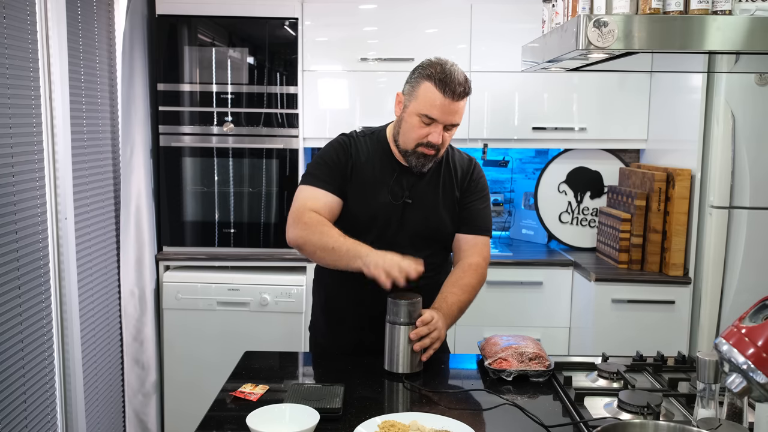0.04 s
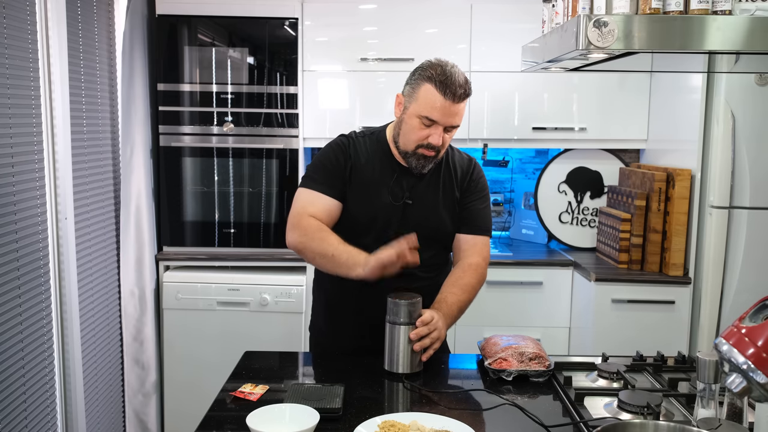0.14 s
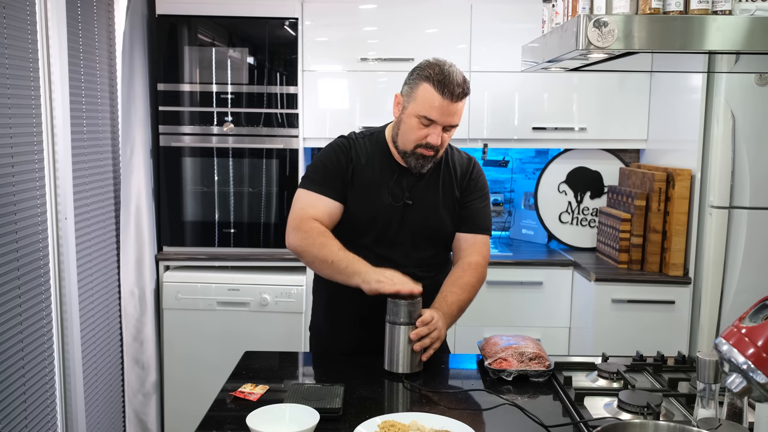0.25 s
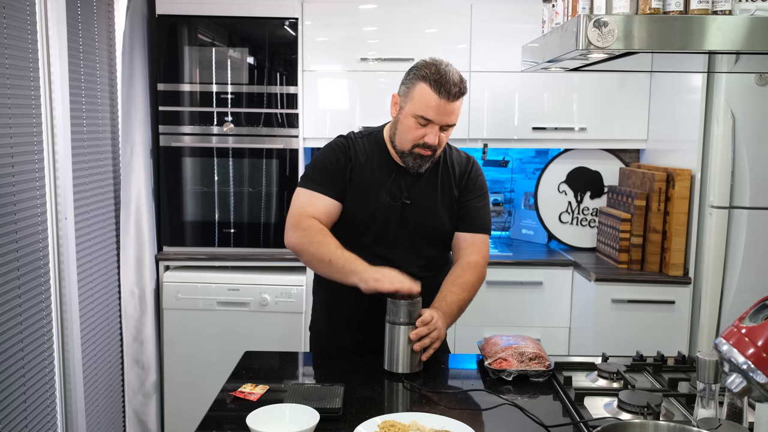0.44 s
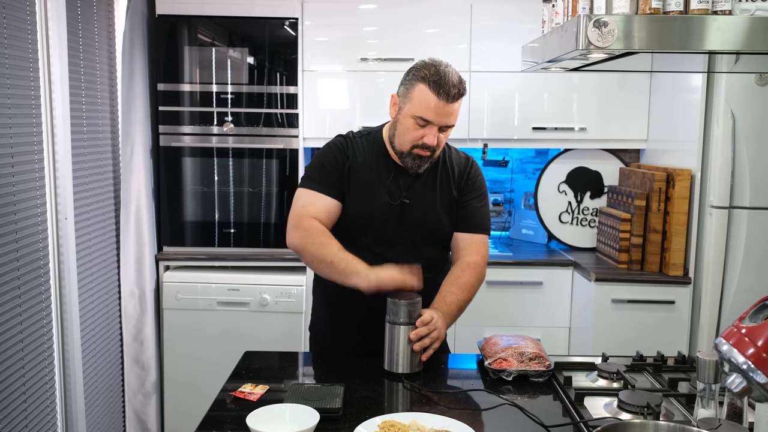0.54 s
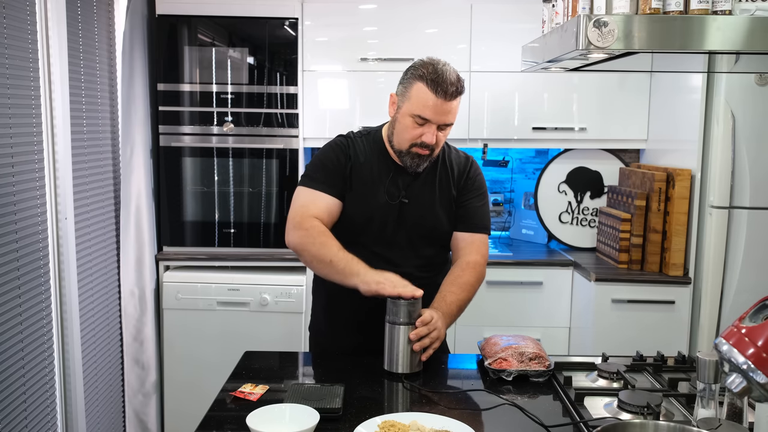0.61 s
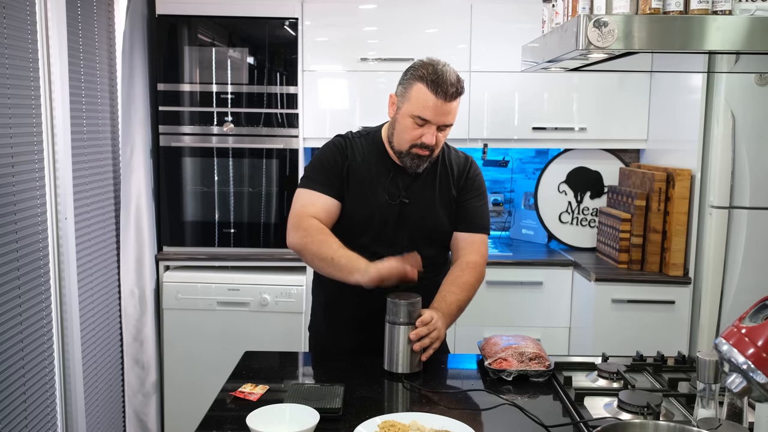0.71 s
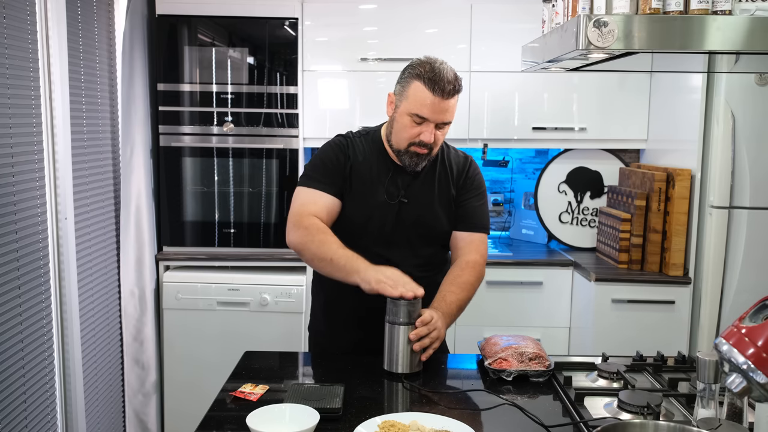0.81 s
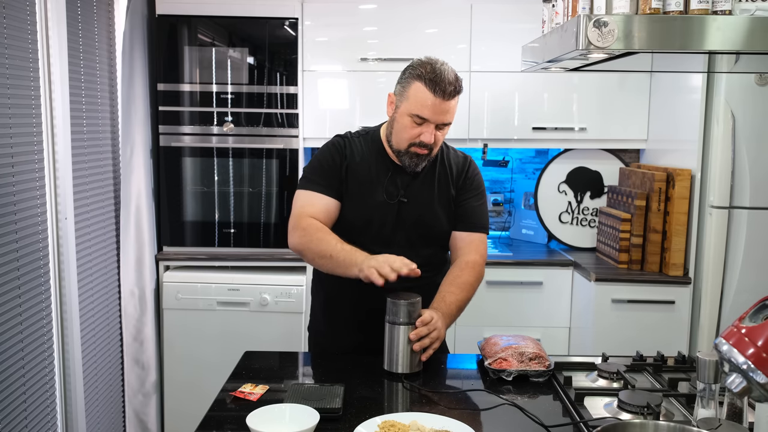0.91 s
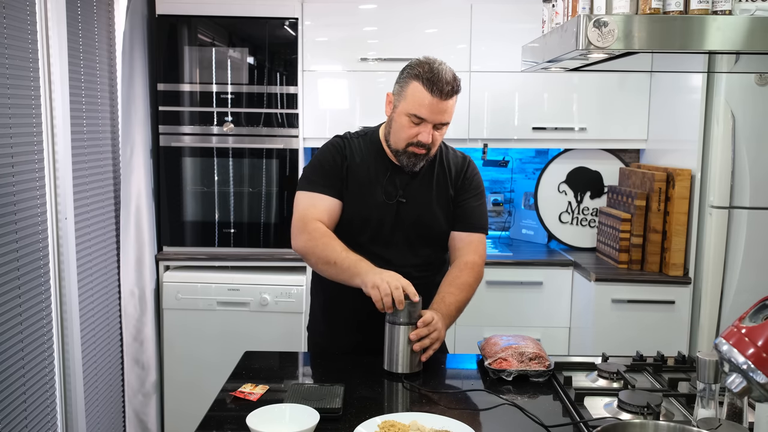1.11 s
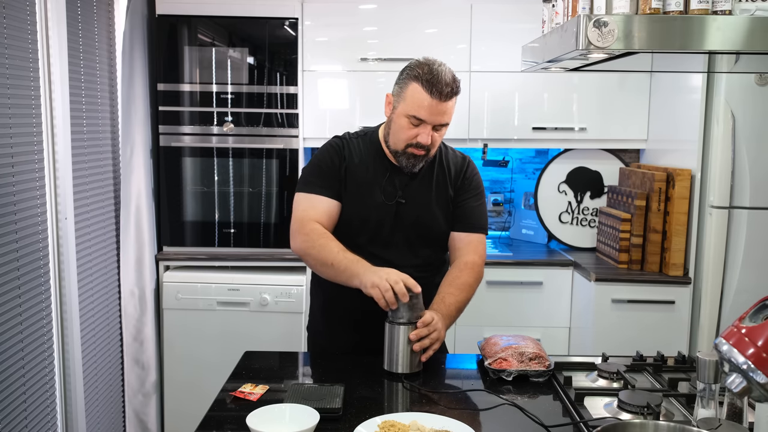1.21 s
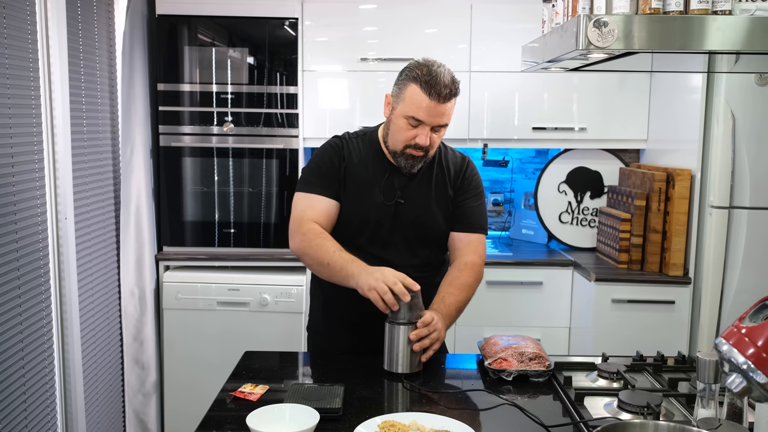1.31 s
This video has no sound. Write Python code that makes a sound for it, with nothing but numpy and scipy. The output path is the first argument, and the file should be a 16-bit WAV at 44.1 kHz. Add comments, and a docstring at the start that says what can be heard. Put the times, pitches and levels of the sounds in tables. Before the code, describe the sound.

Four loud, fleshy, hollow smacks on a metal grinder's lid ring briefly around a hard kitchen, followed by a much softer gritty turn of the lid with small bumps and clicks, over a faint low room hum.

```python
"""In a hard kitchen, a palm slaps the lid of a small steel spice grinder four times on a stone counter.
Each slap is skin crackle, an air-pocket pop and a snap; echoes, a diffuse tail, modes of room and counter
and two short knocks of the lid's body follow. Then the hand twists the lid: noise and grit rub, scrape
and ring the cup, with decaying bumps and clicks. A faint click of the lid opens the scene.
Filtered noise hums quietly throughout, and a faint wavering sine lies under the start."""
import sys
import numpy as np
from scipy import signal
from scipy.fft import rfft, irfft
from scipy.io import wavfile
from scipy.ndimage import uniform_filter1d

SR = 44100
rng = np.random.default_rng(int(sys.argv[2]) if len(sys.argv) > 2 else 0)


def transcribe(signal):
    """Save signal, clipped to [-1, 1], as a 16-bit WAV file at the path in sys.argv[1]."""
    frames = np.atleast_2d(signal).T
    limited = np.clip(frames, -1, 1)
    pcm = np.round(limited * 32767).astype(np.int16)
    wavfile.write(sys.argv[1], SR, pcm)


def ratio(d):
    """dB to gain"""
    e = np.asarray(d, float) / 20
    return 10 ** e


N = 59535  # length [samples]
CONTACT_S = .0028  # time over which the palm's contact grows [s]


def colour(x, table):
    """Minimum-phase filtering: the folded cepstrum of a (Hz, dB) shape gives a causal response."""
    hz, db = np.array(table).T
    f = np.linspace(1, SR / 2, 1025)
    log_gain = np.interp(np.log(f), np.log(hz), db) * np.log(10) / 20
    cepstrum = irfft(log_gain)
    cepstrum[1:1024] *= 2
    cepstrum[1025:] = 0
    response = irfft(np.exp(rfft(cepstrum)))
    return signal.fftconvolve(x, response)[:len(x)]


def level(x, db):
    """Root-mean-square scaling: sets the mean power of a signal."""
    return x * ratio(db) / np.sqrt(np.mean(x ** 2))


def ring(modes, length):
    """Modal superposition: a struck body sounds as a sum of exponentially decaying sines."""
    t = np.arange(length) / SR
    hz, db, t60 = np.array(modes).T[:, :, None]
    decay = 1000. ** (-t / t60)
    return (ratio(db) * np.sin(2 * np.pi * hz * t) * decay).sum(axis=0)


def push(duration):
    """Elastic contact: the force is a half sine, here of unit area."""
    phase = np.clip((np.arange(256) + .5) / (duration * SR), 0, 1)
    force = np.sin(np.pi * phase)
    return force / force.sum()


def add(out, s, x):
    """Linear superposition: sounds starting at different times sum."""
    i = int(s * SR)
    out[i:i + len(x)] += x[:len(out) - i]


# spectral shape of the room noise: (frequency [Hz], relative level [dB])
HUM_SHAPE = [(15, -49), (25, -22.5), (49, 11), (70, 6.5), (86, -17), (183, -5.5), (208, -8), (569, -14),
             (861, -12), (1060, -20.5), (12000, -40.5), (15600, -94), (22000, -120)]


def room_hum():
    """Stationary noise: white noise filtered to the spectrum of a quiet room."""
    return level(colour(rng.standard_normal(N), HUM_SHAPE), -62)


# modes of lid and cup: (frequency [Hz], relative level [dB], T60 [s])
CUP_MODES = [(350, -8, .1), (780, -10, .03), (1320, -12, .05), (1800, -10, .018), (2180, 0, .016),
             (2331, -10, .14), (3550, -18, .05), (4250, -13, .04), (5800, -16, .008), (6700, -8, .008),
             (8000, -12, .006), (9100, -14, .005), (11000, -11, .004)]


def cup_ring(length, above_hz=0):
    """Modal response: the impulse response of lid and cup is the sum of their modes."""
    return ring([mode for mode in CUP_MODES if mode[0] > above_hz], length)


# metal clicks of the lid: (time [s], peak level [dB], contact [s])
LID_CLICKS = [(.008, -62, .0002), (1.066, -66, .0001), (1.097, -60, .0002), (1.193, -45, .0004),
              (1.2685, -39, .00022), (1.338, -43, .0002)]


def lid_clicks():
    """Impact excitation: the derivative of a brief contact force drives the cup modes."""
    out, cup = np.zeros(N), cup_ring(8192)
    for s, db, contact in LID_CLICKS:
        click = np.convolve(np.diff(push(contact)), cup)
        add(out, s, ratio(db) * click / click.max())
    return out


# track of the faint tone: (time [s], frequency [Hz], level before flicker [dB])
TONE_TRACK = [(0.085, 852, -74), (0.097, 818, -79.5), (0.151, 879, -62), (0.177, 872, -77),
              (0.22, 870, -72)]


def faint_tone():
    """Frequency and amplitude modulation: a sine glides in pitch while smoothed noise wavers its level."""
    flicker_db, smoothing_s = 2.5, .02  # rms flicker [dB], averaging time [s]
    t = np.arange(N) / SR
    s, hz, db = np.array(TONE_TRACK).T
    phase = 2 * np.pi * np.cumsum(np.interp(t, s, hz)) / SR
    tone = np.sin(phase) * ratio(np.interp(t, s, db, left=-120, right=-120))
    flicker = level(uniform_filter1d(rng.standard_normal(N), int(smoothing_s * SR)), 0)
    return tone * ratio(flicker_db * flicker)


# spectral shape of the skin crackle: (frequency [Hz], relative level [dB])
SKIN_SHAPE = [(200, -38.5), (600, 7), (1200, -1), (1900, -3.5), (3000, -11), (4100, -4), (5200, -27),
              (9100, -20.5), (14000, -37.5), (16500, -45)]


def skin_crackle(grain, db):
    """Distributed contact: skin touching down makes noise that grows with contact, then decays."""
    crackle_t60 = .005  # [s]
    t = np.arange(len(grain)) / SR
    rise, fall = np.sqrt(t / CONTACT_S), ratio(-60 * (t - CONTACT_S) / crackle_t60)
    skin = colour(grain * np.where(t < CONTACT_S, rise, fall), SKIN_SHAPE)
    # total energy referred to the contact time
    return skin * ratio(db) / np.sqrt(np.sum(skin ** 2) / (CONTACT_S * SR))


def air_pop(hz, db, length):
    """Cavity resonance: the changing push of the palm excites the air trapped beneath it."""
    push_s, pocket_t60 = .0013, .016  # [s]
    pocket = ring([(hz, 0, pocket_t60)], length)
    pop = np.convolve(np.diff(push(push_s), prepend=0), pocket)
    return ratio(db) * pop / -pop.min()  # level of the negative peak


# spectral shape of the snap: (frequency [Hz], relative level [dB])
SNAP_SHAPE = [(1500, -25.5), (3000, 2.5), (4200, -1), (5500, -0.5), (9000, 0), (13000, -7), (16500, -21.5)]


def palm_snap(grain, db):
    """Transient radiation: the palm snapping shut gives a burst of bright, quickly decaying noise."""
    snap_t60 = .003  # [s]
    t = np.arange(len(grain)) / SR
    snap = colour(grain[::-1] * ratio(-60 * t / snap_t60), SNAP_SHAPE)
    return ratio(db) * snap / np.abs(snap).max()


# palm slaps: (time [s], air pop peak [dB], skin crackle level [dB], air pocket pitch [Hz],
# strength in the room [dB])
PALM_SLAPS = [(0.2334, -11.5, -20.5, 438, 3.2), (0.4217, -9, -15.5, 403, 2.8), (0.6044, -8, -18, 414, 3.6),
              (.7826, -9.5, -18, 422, 2.9)]


def slaps():
    """Impact on a coupled system: skin, trapped air and metal cup each answer the landing palm."""
    cup_db, snap_db, snap_delay = -50.5, 2.5, .0019  # cup drive [dB], snap over skin [dB], delay [s]
    out, length = np.zeros(N), 2048
    cup = cup_ring(length)
    for s, pop_db, skin_db, hz, _ in PALM_SLAPS:
        grain = rng.standard_normal(length)
        skin = skin_crackle(grain, skin_db)
        cup_answer = np.convolve(skin, cup)[:length]
        add(out, s, skin + ratio(cup_db) * cup_answer)
        add(out, s + snap_delay, palm_snap(grain, skin_db + snap_db))
        # the pop starts half a period before contact is complete
        add(out, s + CONTACT_S - .5 / hz, air_pop(hz, pop_db, length))
    return out


# spectrum a slap sends into the room: (frequency [Hz], level before slap strength [dB])
SENT_SPECTRUM = [(40, -57.5), (100, -62.5), (200, -22.5), (420, -24), (800, -20.5), (1200, -25.5),
                 (2000, -34), (4200, -41), (5500, -42.5), (9500, -47), (13000, -49.5), (16500, -54.5)]


def slap_pulses():
    """Impulsive excitation: each slap drives the room with one spectrally shaped pulse."""
    pulses = np.zeros(N)
    for s, _, _, _, room_db in PALM_SLAPS:
        add(pulses, s + CONTACT_S, ratio(np.array([room_db])))
    return colour(pulses, SENT_SPECTRUM)


# decay of the diffuse tail: (frequency [Hz], T60 [s])
TAIL_DECAY = [(100, 0.1), (300, 0.56), (700, .45), (1500, 0.37), (4000, 0.44), (9000, 0.38), (16000, 0.11)]


def room_tail(source):
    """Diffuse-field reverberation: dense echoes decay band by band, strongest early on."""
    start_s, early_db, early_t60 = .001, -4, .045  # onset [s], extra early sound [dB], its T60 [s]
    t = np.arange(SR // 2) / SR
    hz, t60 = np.array(TAIL_DECAY).T
    noise = rfft(rng.standard_normal(len(t)))
    log_f = np.log(np.arange(len(t) // 2 + 1) * 2 + 1.)  # bins are 2 Hz apart
    response = np.zeros(len(t))
    for k in range(len(hz)):
        # overlapping triangular bands on a log-frequency axis
        band = np.interp(log_f, np.log(hz), np.arange(len(hz)) == k)
        response += irfft(noise * band) * ratio(-60 * t / t60[k])
    early = 1 + ratio(early_db - 60 * t / early_t60)
    onset = np.clip(t / start_s - 1, 0, 1)  # full at twice the onset time
    return signal.fftconvolve(source, response * early * onset)[:N]


# modes of room and counter, and two short knocks of the lid's body (780 and 1070 Hz):
# (frequency [Hz], level before slap strength and scatter [dB], T60 [s], arrival after contact [s])
SLAP_MODES = [(100, -40, .22, .008), (115, -40, .22, .008), (168, -40, .26, .01), (190, -38, .2, .01),
              (232, -43, .33, .01), (283, -43, .3, .01), (307, -39, .36, .01), (400, -44, .3, .005),
              (425, -36, .36, .005), (450, -42, .35, .005), (470, -44, .3, .005), (560, -44, .22, .005),
              (760, -44, .25, .005), (880, -45, .3, .005), (780, -30, .045, .001), (1070, -33, .045, .001)]


def modes_and_knocks():
    """Modal build-up: modes of room and counter, and two short knocks of the lid's body, swell in."""
    scatter_db, build_s = 2, .0074  # random spread [dB], build-up time constant [s]
    out, t = np.zeros(N), np.arange(SR // 2) / SR
    build_up = 1 - np.exp(-t / build_s)
    for s, _, _, _, room_db in PALM_SLAPS:
        for hz, db, t60, late in SLAP_MODES:
            mode_db = db + room_db + scatter_db * rng.standard_normal()
            mode = ring([(hz, mode_db, t60)], len(t)) * build_up
            add(out, s + CONTACT_S + late, mode)
    return out


# first echoes off counter and cupboards: (delay [s], level before the low-pass [dB])
FIRST_ECHOES = [(.0053, -12.5), (.0072, -15.5), (.0118, -15), (0.0175, -20)]


def echoes(direct):
    """Early reflection: delayed copies of the direct sound return with less treble."""
    out = np.zeros(N)
    for delay, db in FIRST_ECHOES:
        add(out, delay, ratio(db) * direct)
    return signal.sosfilt(signal.butter(1, 2310, fs=SR, output="sos"), out)  # low-pass corner [Hz]


# spectral shape of the low rub: (frequency [Hz], relative level [dB])
RUB_SHAPE = [(71, -45.5), (120, -2), (349, 14), (485, 7), (757, 6), (964, 1), (1270, 1), (2500, -4.5),
             (3250, -35), (5500, -120)]


def low_rub():
    """Sliding friction: continuous contact radiates low filtered noise, here at unit rms."""
    return level(colour(rng.standard_normal(N), RUB_SHAPE), 0)


# spectral shape of the scrape: (frequency [Hz], relative level [dB])
SCRAPE_SHAPE = [(1200, -34.5), (2000, -3.5), (3000, -2.5), (4200, 4), (5000, -8), (6500, -2.5),
                (9000, -6.5), (12000, -15.5), (16000, -25)]


def high_scrape(envelope):
    """Random impact excitation: sparse grit impulses scrape and ring the high cup modes."""
    rate, spread_db, ring_db = 6000, 1.5, -5  # grains [1/s], mean excess [dB], ring drive [dB]
    size = ratio(spread_db * rng.exponential(size=N))
    struck = rng.random(N) < rate / SR
    grit = size * struck * rng.standard_normal(N)
    scrape = level(colour(grit, SCRAPE_SHAPE), -1) * envelope
    cup = level(cup_ring(8500, above_hz=3000), ring_db) / np.sqrt(8192)
    rings = signal.fftconvolve(level(grit, 0) * envelope, cup)[:N]
    return scrape + rings


# course of the twist: (time [s], low rub level [dB], high scrape drive [dB])
TWIST_COURSE = [(1.14, -79, -88.5), (1.159, -66, -90), (1.18, -60, -76), (1.187, -47, -61),
                (1.197, -47.5, -62), (1.206, -57.5, -71), (1.216, -49, -62), (1.228, -64, -59),
                (1.244, -52, -57.5), (1.25, -49.5, -63), (1.258, -55, -67), (1.263, -58, -56),
                (1.285, -57, -60.5), (1.305, -56.5, -67.5), (1.318, -60.5, -70.5), (1.335, -66, -72.5),
                (1.34, -53, -60.5), (1.35, -72, -59)]


def twist():
    """Friction modulation: the levels of rub and scrape follow the turning of the lid."""
    t = np.arange(N) / SR
    s, rub_db, scrape_db = np.array(TWIST_COURSE).T
    rub = low_rub() * ratio(np.interp(t, s, rub_db, left=-120))
    return rub + high_scrape(ratio(np.interp(t, s, scrape_db, left=-120)))


# lid bumps: (time [s], level [dB], pitch [Hz], T60 [s])
LID_BUMPS = [(1.1595, -54, 300, .04), (1.1862, -41, 700, .015), (1.2125, -38, 420, .022),
             (1.2452, -40, 480, .02), (1.247, -52, 350, .16), (1.281, -50, 650, .05)]


def lid_bumps():
    """Damped resonance: each bump of the lid is one decaying sine, starting downward."""
    out = np.zeros(N)
    for s, db, hz, t60 in LID_BUMPS:
        add(out, s, -ring([(hz, db, t60)], 4096))
    return out


def scene():
    """Direct and reverberant fields: slaps, lid, hum and tone sum with the kitchen's response."""
    background = room_hum() + faint_tone()
    hits = slaps()
    lid = lid_clicks() + twist() + lid_bumps()
    lid_room_db = -49.5  # lid sound sent into the room [dB]
    tail = room_tail(slap_pulses() + ratio(lid_room_db) * lid)
    return (background + hits + echoes(hits) + lid + tail + modes_and_knocks())[None]


def roll_off(x):
    """The treble ends steeply here."""
    return signal.sosfilt(signal.butter(12, 16800, fs=SR, output="sos"), x)


def record(dry):
    """High-pass response and saturation: the microphone thins deep bass and rounds the loudest peaks."""
    low_hz, limit = 74, .6  # bass corner [Hz], saturation amplitude
    thinned = signal.sosfilt(signal.butter(4, low_hz, "high", fs=SR, output="sos"), dry)
    mix = limit * np.tanh(thinned / limit)
    return roll_off(mix)


dry = scene()
out = record(dry)
transcribe(out)
```